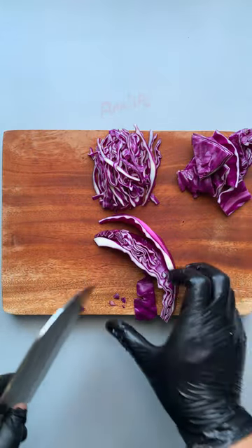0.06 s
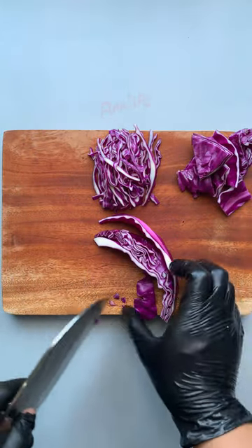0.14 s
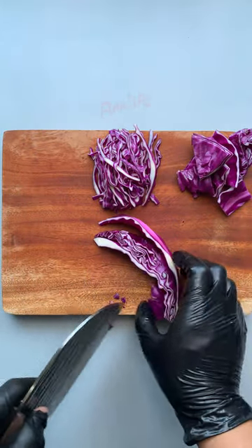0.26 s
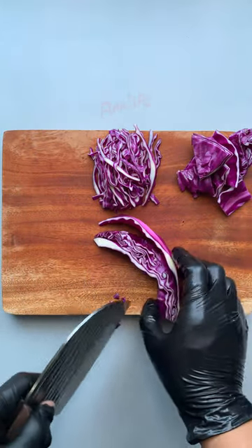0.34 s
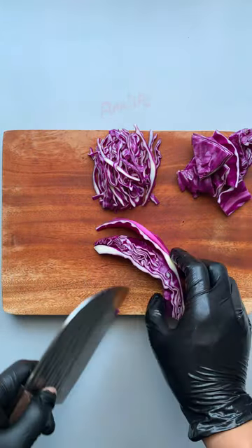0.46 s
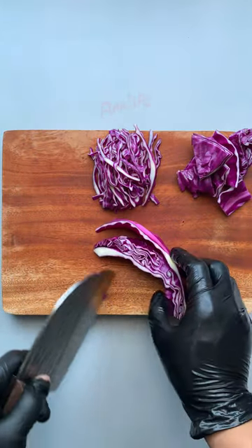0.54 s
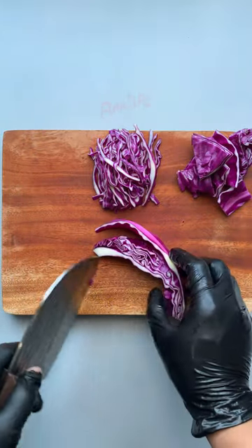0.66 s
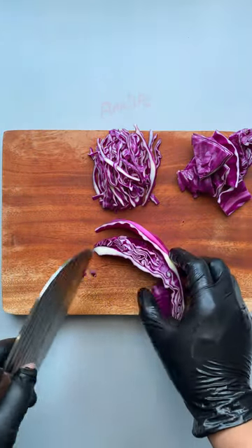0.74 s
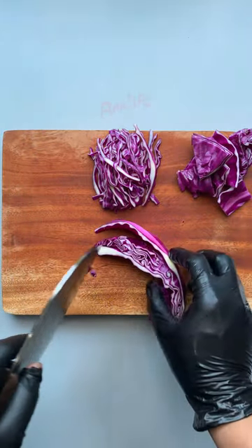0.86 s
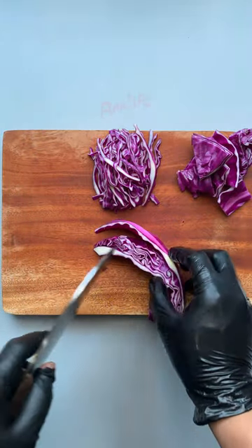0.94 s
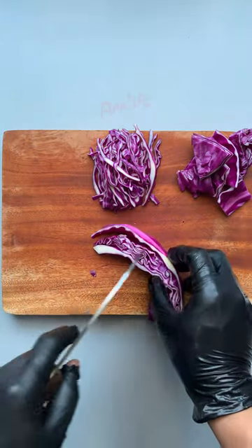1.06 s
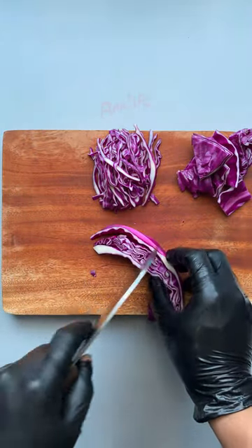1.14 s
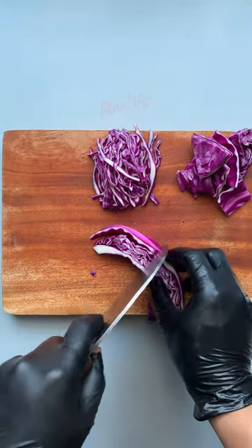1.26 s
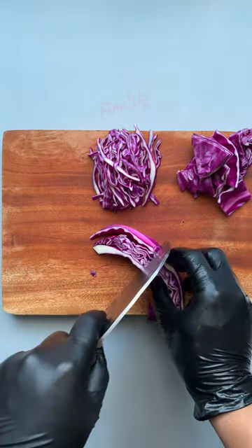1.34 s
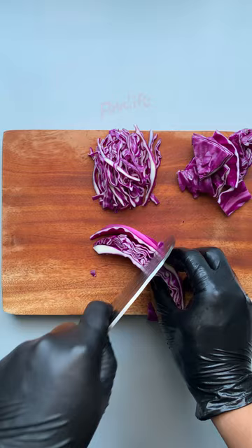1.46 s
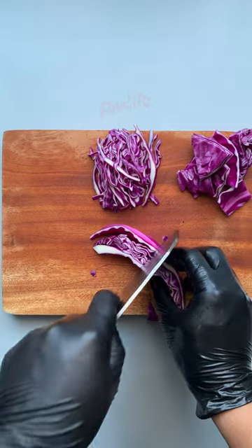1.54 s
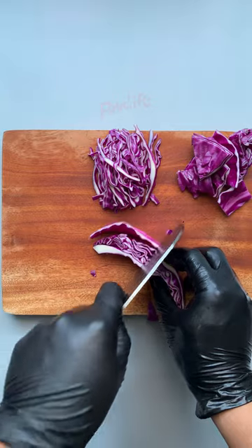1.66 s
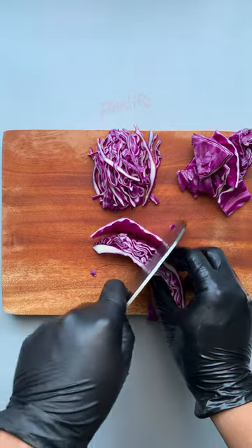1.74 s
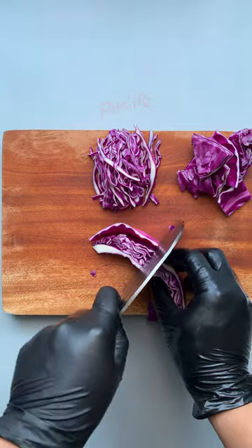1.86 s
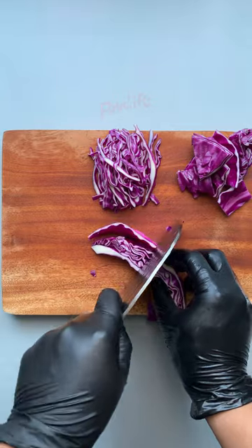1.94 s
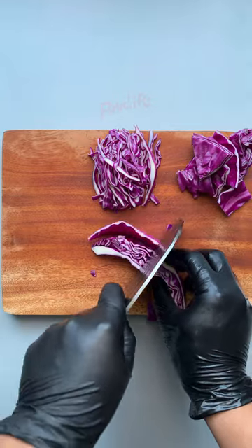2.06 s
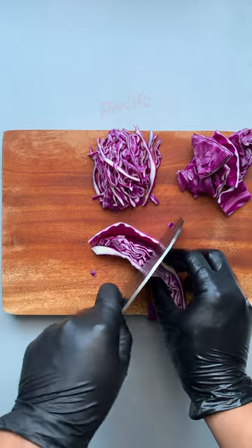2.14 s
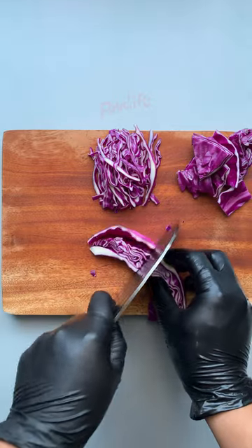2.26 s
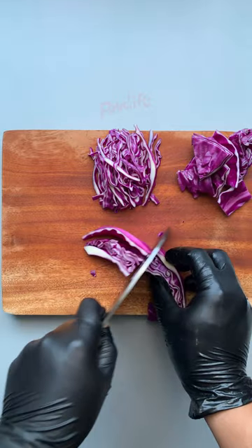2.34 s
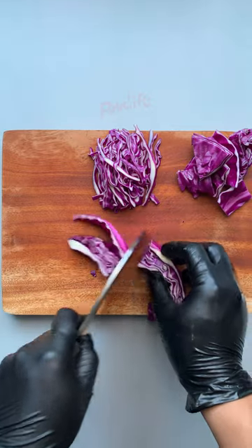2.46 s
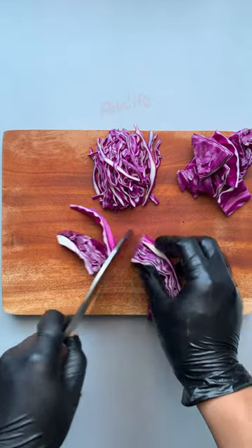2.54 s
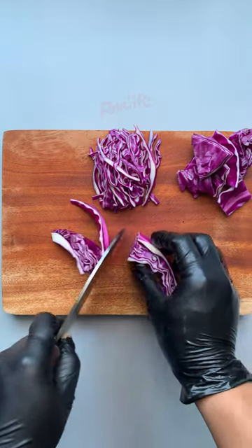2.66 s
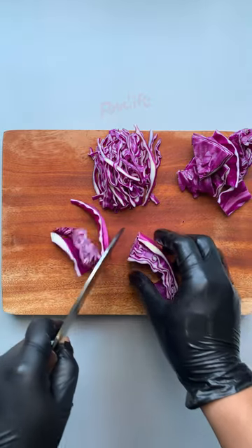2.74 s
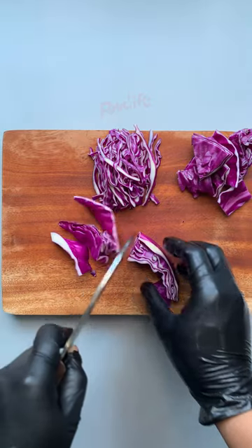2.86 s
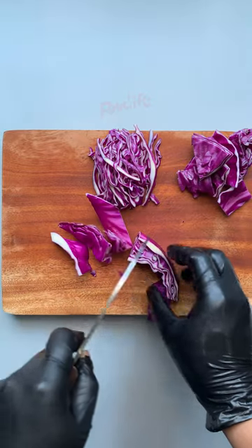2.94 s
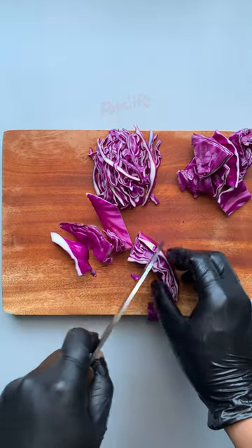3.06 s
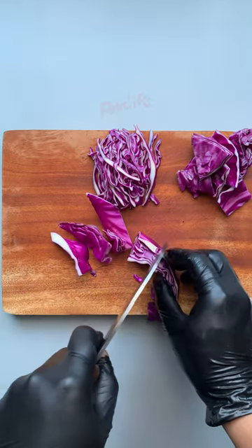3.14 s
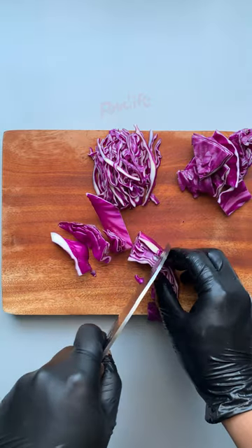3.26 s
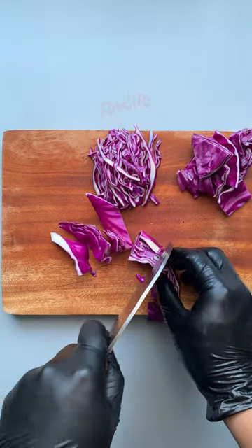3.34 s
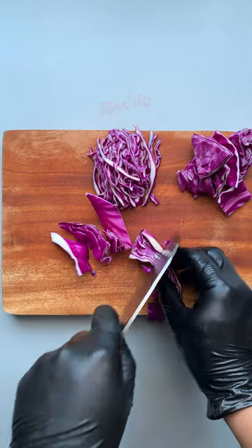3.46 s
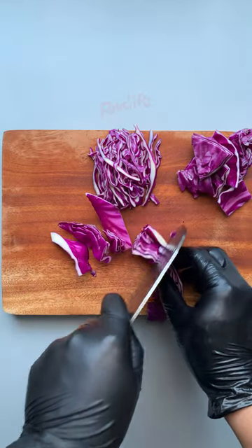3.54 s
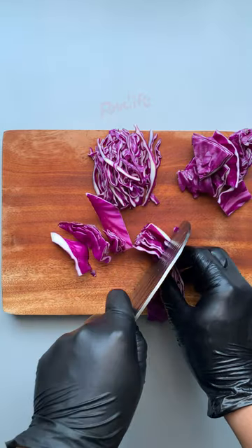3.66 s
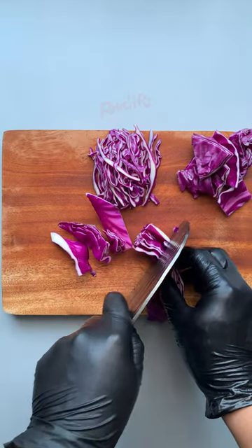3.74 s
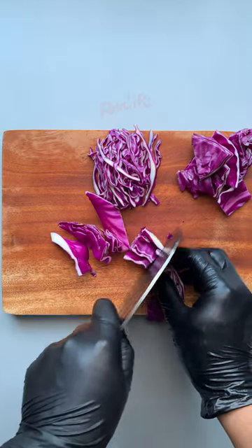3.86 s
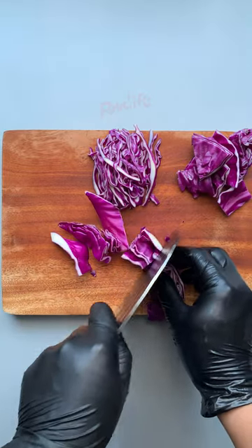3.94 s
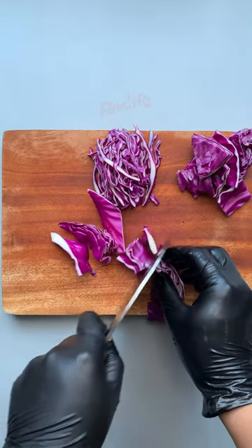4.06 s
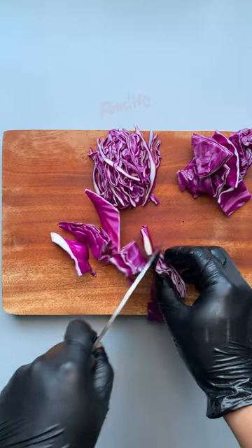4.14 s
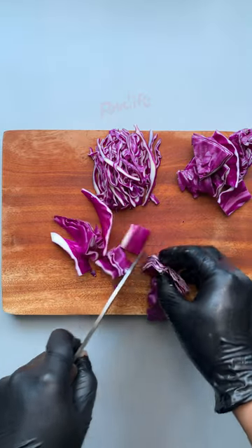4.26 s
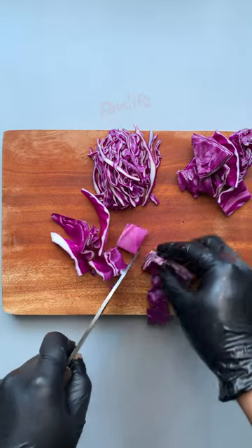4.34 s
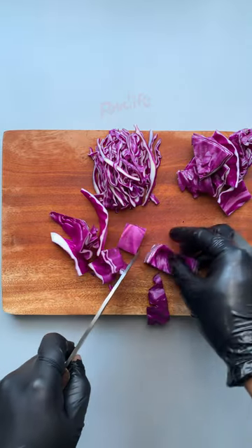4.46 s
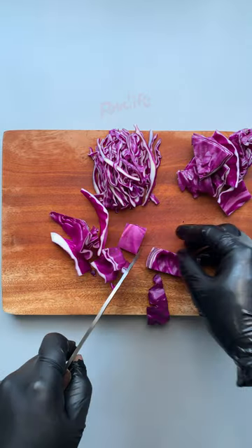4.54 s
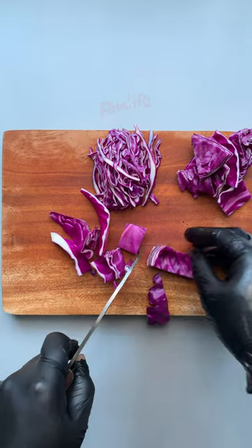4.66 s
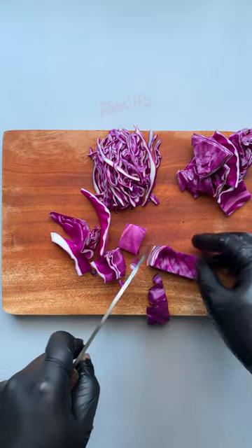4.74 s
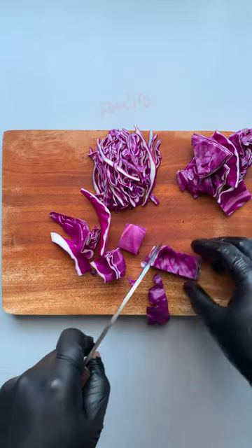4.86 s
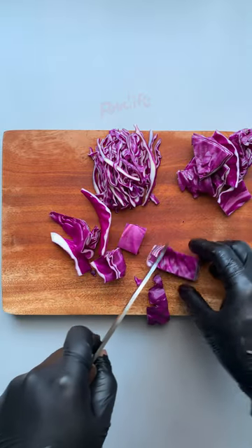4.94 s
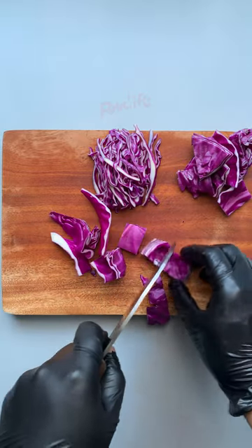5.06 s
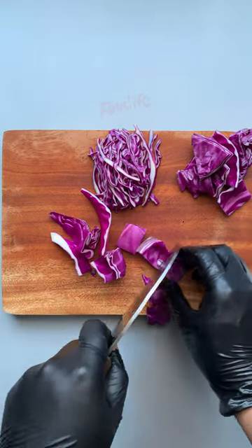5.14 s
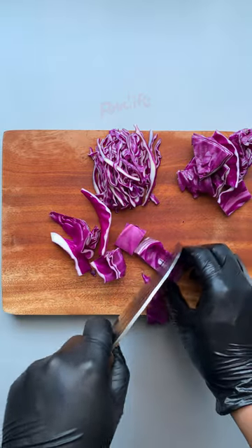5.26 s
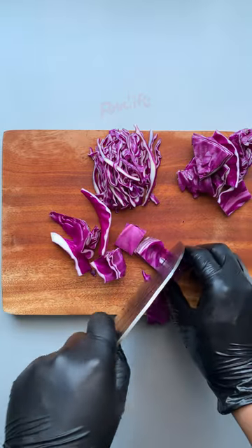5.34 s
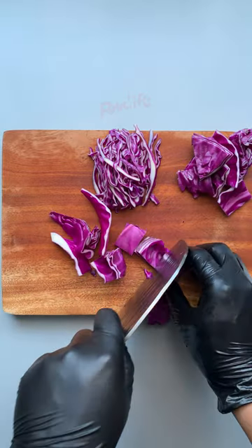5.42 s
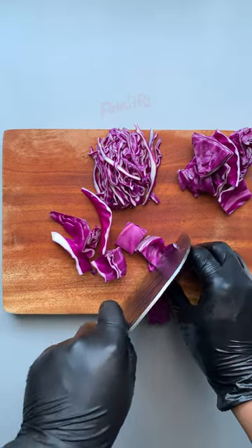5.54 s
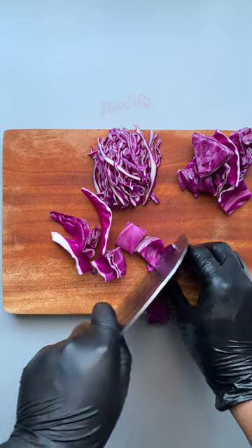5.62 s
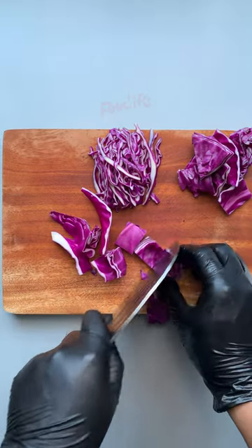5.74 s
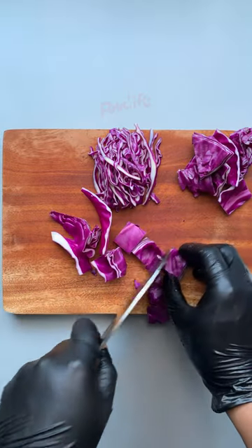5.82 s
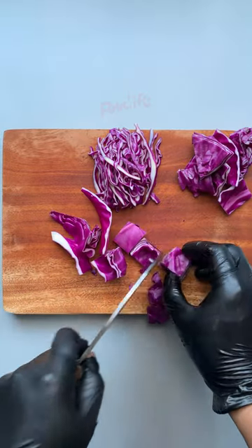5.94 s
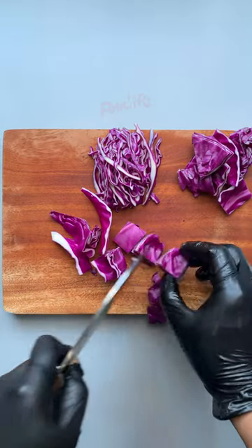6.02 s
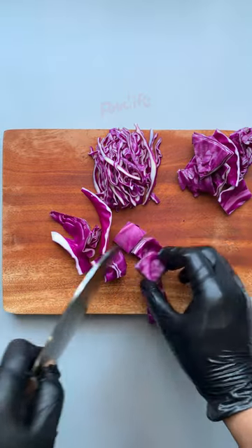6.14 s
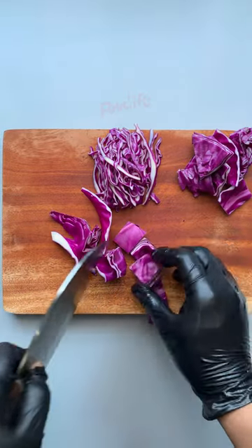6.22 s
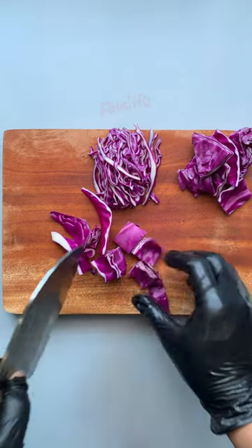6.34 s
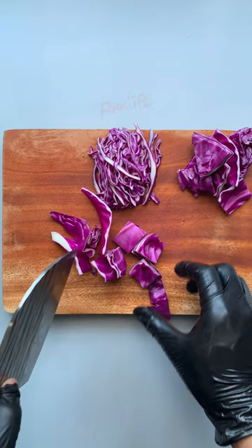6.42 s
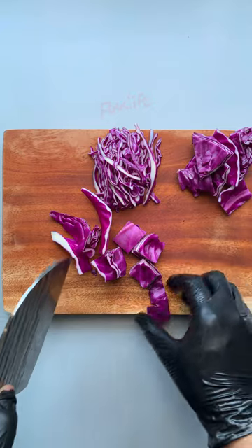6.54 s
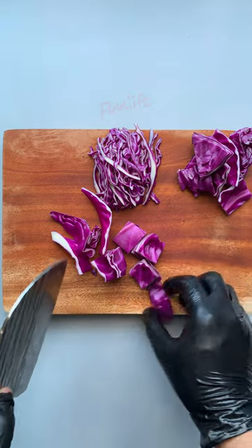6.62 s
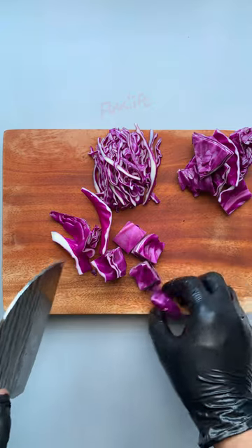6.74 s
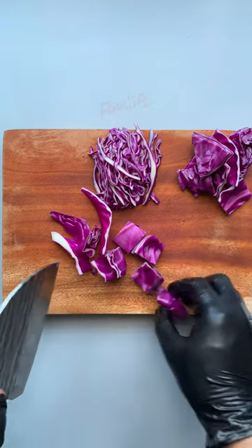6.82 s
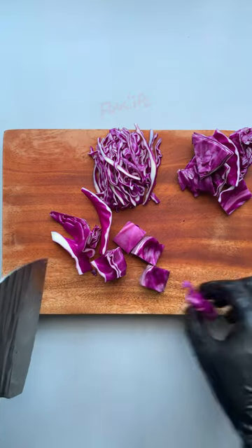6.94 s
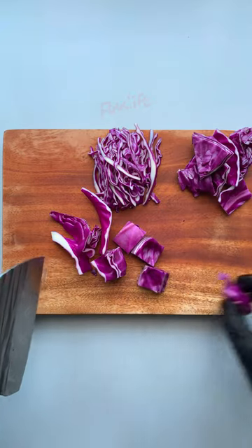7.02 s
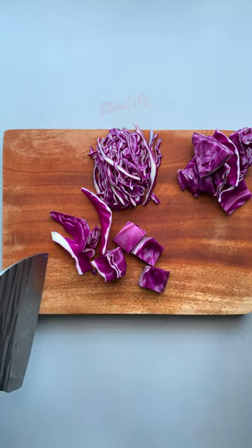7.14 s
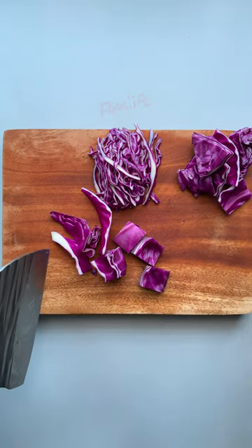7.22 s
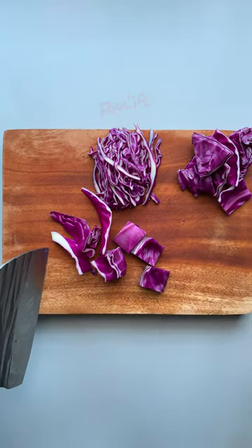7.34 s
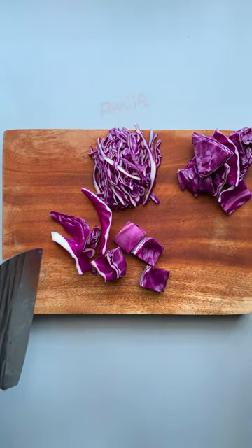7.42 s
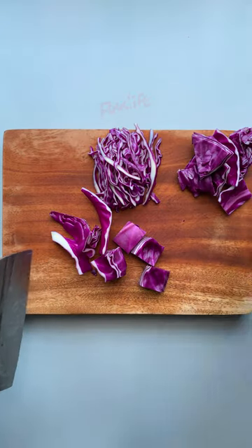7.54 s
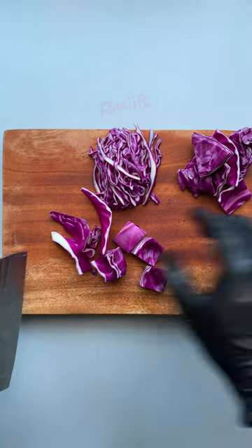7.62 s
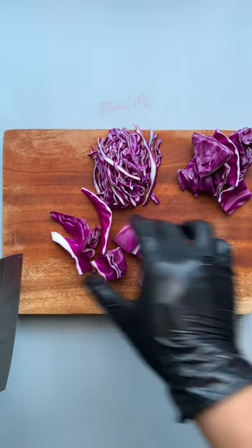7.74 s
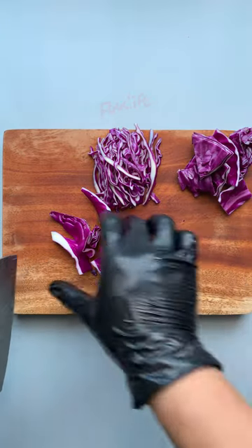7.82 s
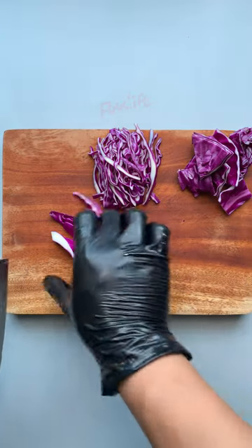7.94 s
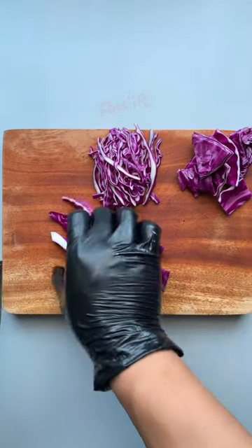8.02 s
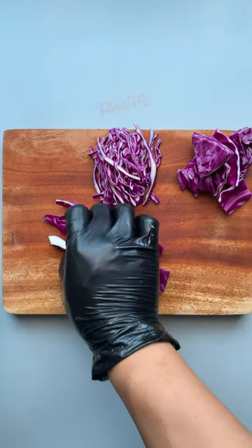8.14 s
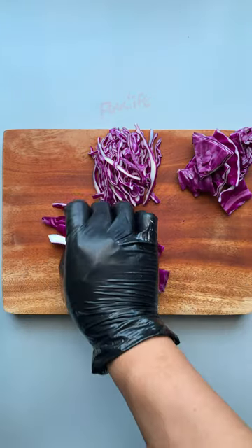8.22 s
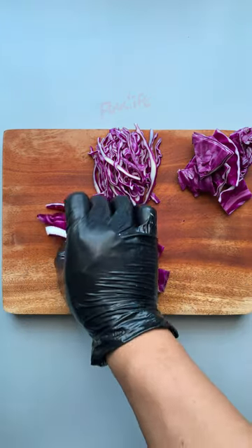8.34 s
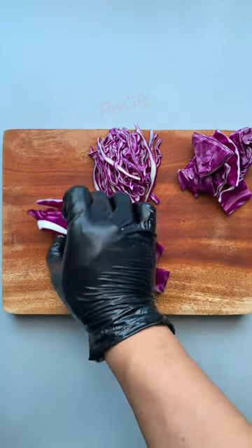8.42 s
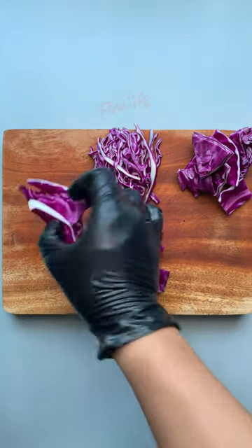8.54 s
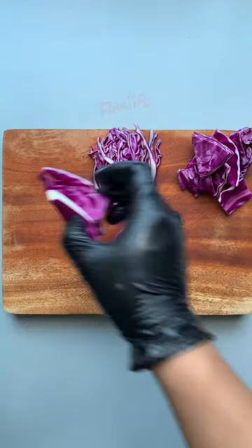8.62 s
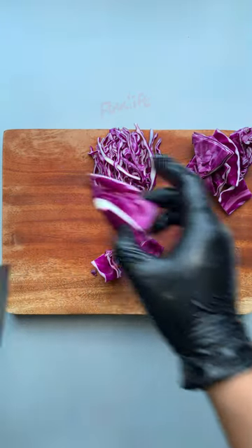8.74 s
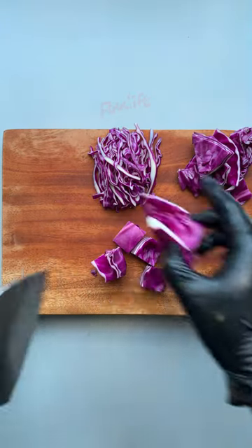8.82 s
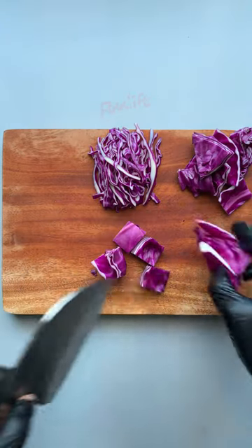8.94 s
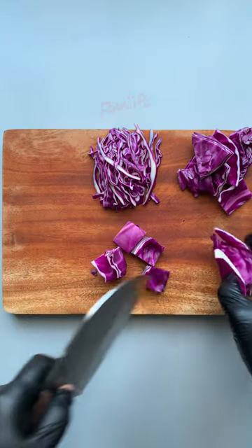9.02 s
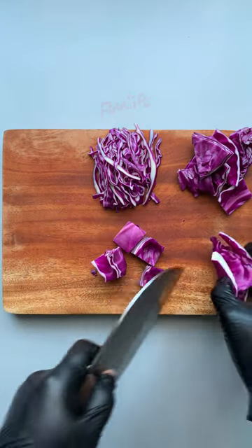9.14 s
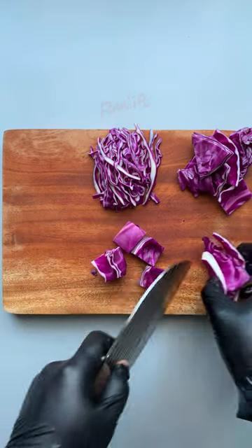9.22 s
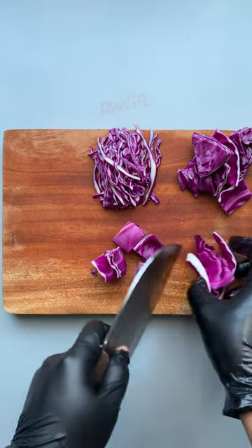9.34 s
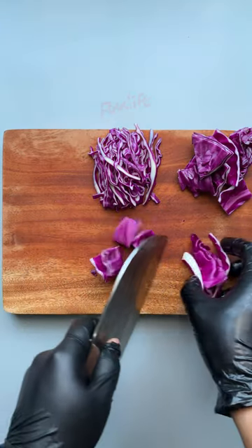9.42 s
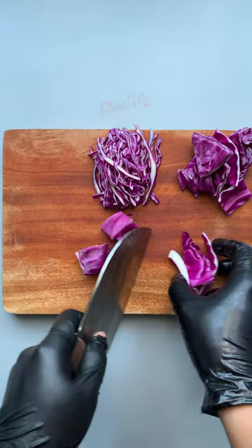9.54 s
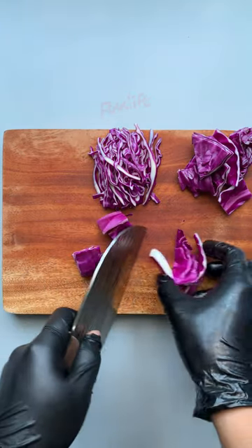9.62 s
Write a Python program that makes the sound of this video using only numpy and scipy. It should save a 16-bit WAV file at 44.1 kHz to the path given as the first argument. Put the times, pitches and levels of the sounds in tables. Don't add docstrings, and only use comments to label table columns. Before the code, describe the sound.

Close above a wooden cutting board in a quiet, slightly reverberant kitchen, a heavy knife crunches through crisp cabbage. A light knock and steel slide come first, then a tearing cut and raspy scrape, a longer cut ending in a loud sharp knock, and a quick last cut. Gloved hands then rustle and tick among wet leaves before a short skipping blade scrape. Low appliance hum continues beneath.

```python
import sys
import numpy as np
from scipy import signal
from scipy.fft import rfft, irfft
from scipy.io import wavfile
from scipy.ndimage import uniform_filter1d, map_coordinates

SR = 44100
rng = np.random.default_rng(int(sys.argv[2]) if len(sys.argv) > 2 else 0)


def pcm_store(signal):
    levels = np.round(np.clip(np.atleast_2d(signal), -1, 1) * 32767)
    wavfile.write(sys.argv[1], SR, levels.astype(np.int16).T)


def invert_db(x):
    u = np.asarray(x, float) / 20
    return 10 ** u


N = 426888
T = np.arange(N) / SR
HZ = np.maximum(np.arange(N // 2 + 1) * SR / N, 1)

# (pitch [Hz], level [dB])
HUM = [(15, -45), (25, -20), (87, 2), (119, -4), (192, -10.5), (363, -15.5), (425, -12.5), (485, -19),
       (802, -25), (868, -27), (1130, -27.5), (3730, -33.5), (5000, -42), (8000, -55), (10000, -52.5),
       (11400, -57), (14000, -70)]
HUM_DB = -56.5
# (time [s], level [dB])
AIR = [
    [(0, 1), (1, -2), (2.5, 2), (4.3, 4), (5.2, 4.5), (6.2, 2), (6.8, 4), (7.5, 3.5), (8.3, 0), (9, -2.5),
     (9.68, 1)],
]
PATCHY_DB = 1.5

# (start [s], level [dB], hold [s])
RUSTLES = [(0.0, -60, 0), (0.27, -68.5, 0.061), (0.38, -62.5, 0.026), (0.655, -73.5, 0.038),
           (0.784, -55.5, 0), (0.93, -75.5, 0.039), (1.102, -68, 0), (1.292, -66.5, 0.15),
           (1.81, -64.5, 0.06), (2.08, -43.5, 0.024), (2.17, -62, 0.024), (2.62, -63.5, 0.056),
           (2.734, -62.5, 0.069), (3.212, -73.5, .05), (3.33, -58, 0.012), (3.791, -37.5, 0),
           (4.292, -73.5, 0.094), (4.56, -75, 0.16), (4.625, -67, 0), (4.87, -78, 0.069),
           (5.274, -74.5, 0.19), (5.395, -60.5, 0.019), (5.505, -33, 0.011), (5.6, -58.5, 0.17),
           (5.78, -47.5, 0.014), (5.83, -72, 0.031), (5.899, -55, 0), (5.93, -64, 0.22), (6.2, -79, 0.29)]
# (start [s], level [dB], hold [s])
GRIPS = [(7.21, -62, 0.011), (7.36, -57.5, 0.029), (7.6, -62, 0.076), (7.675, -53.5, 0.022),
         (7.75, -55, 0.039), (7.93, -56.5, 0), (8.02, -63.5, 0), (8.22, -65, 0), (8.33, -73, 0.0045),
         (8.5, -70, 0.0087), (8.615, -62.5, 0.19), (8.742, -56.5, 0.0028), (8.86, -64.5, 0.083),
         (9.12, -82, 0.034), (9.31, -56, 0.0053), (9.36, -75, 0.13)]
# (time [s], level [dB])
CUTS = [
    [(1.42, -71.5), (1.49, -60.5), (1.566, -55), (1.58, -51), (1.65, -42), (1.706, -46), (1.8, -74)],
    [(1.888, -72), (1.894, -53.5), (1.924, -57.5), (2.018, -90.5)],
    [(2.018, -79), (2.06, -51.5), (2.08, -43.5)],
    [(3.38, -71), (3.466, -55.5), (3.48, -44.5), (3.552, -43), (3.61, -40.5), (3.66, -45.5), (3.726, -67),
     (3.766, -55), (3.785, -60.5)],
    [(5.43, -57), (5.476, -49), (5.496, -35.5), (5.505, -33.5)],
]
# (tearing [dB], boom of the packed leaves [dB], upper board notes [dB])
CUT_MIX = [
    (-2.5, 3, -16.5),
    (10.5, 10.5, -22),
    (8.5, 1.5, -13),
    (-7, 0, -14),
    (-7.5, 1, -1.5),
]
# (pitch [Hz], level [dB], ring time [s])
HEADS = [
    [(318, 4.5, 0.072), (486, 4.5, 0.036)],
    [(280, 8, 0.14), (606, -11, 0.08)],
    [(300, 15.5, 0.08), (606, -25, .04)],
    [(317, -3.5, .07), (380, 0, .07), (650, -4.5, 0.032)],
    [(272, -2.5, 0.11), (470, 7.5, .04)],
]
# (pitch [Hz], level [dB])
LEAF = [(2500, -22), (4100, 1), (5100, -1), (6200, -3), (8000, -1), (10000, 0), (12500, -9.5),
        (14300, -5.5), (15500, -19.5), (16500, -54)]
# (pitch [Hz], level [dB])
TEARING = [(900, -7), (1400, -9), (2200, -5), (3000, -2), (3700, -1.5), (5000, -7.5), (7000, -26)]

# (pitch [Hz], level [dB], ring time [s])
ROOM = [(90.04, -11.5, 0.27), (193.6, 2, 0.65), (455, -9.5, 0.74), (985, -9, 0.98), (1980, -10, 0.56),
        (3300, -15.5, 0.8), (5300, -30, .25), (9000, -28, .2)]
HUSH_DB = -57

# (time [s], peak [dB], then relative to it: low notes [dB], upper notes [dB], hard crack [dB])
KNOCKS = [(0.39, -28.5, -1, -37, -7.5), (1.383, -47.5, 7, -26.5, -21), (2.083, -30, 0, -5, -21.5),
          (3.327, -33.5, 2, -18, -41.5), (3.8055, -3, -18.5, -7, -3.5), (4.175, -47, -10, -1.5, 2),
          (5.41, -37.5, 4, -15.5, -29.5), (5.496, -39, -1, -23, -41), (5.515, -8.5, -9, -23.5, -31),
          (5.528, -25, -1.5, -15, -8.5), (5.617, -55.5, 18, -38.5, -21), (5.797, -15, -13, -4, -21),
          (7.405, -55.5, -6, -4.5, 1), (3.8132, -21, -10.5, -10, 6)]
# (pitch [Hz], level [dB], ring time [s])
BOARD = [(104, -0.5, 0.71), (119.6, 3, 0.51), (177, 5.5, 0.11), (271.6, 2, 0.11), (330, 3, 0.1),
         (471, 1.5, 0.038), (508.4, -0.5, 0.034), (650, 0, 0.028), (780, -15.5, 0.038), (872, 5, 0.03215),
         (1121, 10, 0.065), (1453, 2.5, 0.12), (1664, -15.5, 0.04), (1901, -0.5, 0.04), (2180, -17, 0.034),
         (2460, -26.5, .012), (3250, -22.5, 0.036), (3150, -30.5, .01)]
# (pitch [Hz], level [dB], ring time [s])
RIM = [(458, -1, 0.09), (655, 1.5, 0.087), (693, -4, 0.21), (800, -3, 0.069)]
# (pitch [Hz], level [dB], ring time [s])
ROCK = [(118.2, 0, .35), (141, -3, 0.23)]
# (time of the knock [s], level under it [dB], swell [s])
LEAD_INS = [
    (.389, -18.5, 0.006),
    (2.086, -37, .004),
    (3.805, -27, .015),
    (5.515, -49, .0045),
    (5.796, -30, 0.0046),
]
THUD_DB = -10
# (time [s], energy [dB], lowest [Hz], highest [Hz])
BLASTS = [(.391, -6, 151, 450), (.391, -3, 470, 880), (2.085, -4.5, 175, 500), (3.807, 13, 330, 800),
          (3.807, 14, 800, 2050), (3.807, -15, 2278, 4000), (3.806, 2.5, 146, 300), (5.516, 6, 162, 650),
          (5.515, -12, 650, 1600), (5.798, -6.5, 247, 890), (5.798, -7.5, 873, 1350),
          (3.329, -12.5, 120, 500)]
DIRECT_DB = -11

# (time [s], level [dB])
SCRAPES = [
    [(2.22, -69.5), (2.262, -65), (2.36, -59), (2.43, -57)],
    [(9.47, -68), (9.488, -56.5), (9.51, -75), (9.518, -54.5), (9.652, -71.5), (9.68, -67)],
    [(2.43, -54), (2.45, -51.5), (2.54, -50), (2.575, -55.5), (2.618, -79.5), (2.64, -68)],
]
# (grain rasp [dB], shaken board [dB])
SCRAPE_MIX = [
    (4, 2.5),
    (1, 0.5),
    (2, 7),
]
# (time [s], level [dB])
SLIDES = [
    [(0.42, -65), (0.446, -75), (0.452, -60.5), (0.56, -51.5), (0.638, -77), (0.66, -73)],
    [(3.95, -76.5), (4.02, -57), (4.124, -65), (4.146, -56), (4.166, -73), (4.174, -62), (4.24, -74)],
]
# (pitch [Hz], level [dB], ring time [s])
STEEL = [
    [(3440, -6.5, .03), (3930, -6, .03), (5800, 3, .04), (6700, 4, 0.043), (7140, -0.5, .04),
     (8700, -5.5, .04), (12100, -5, .05)],
    [(3000, 1.5, .08), (3590, -2, .05), (5840, 0.5, 0.051), (6300, 0, .04), (6910, 1.5, 0.041),
     (8580, -5, .06), (12100, -9.5, .06)],
    [(2920, 1, 0.1), (3660, 4.5, 0.056), (4070, -7.5, .04), (4880, -11, .06), (5750, 0.5, 0.048),
     (6460, -15.5, 0.043), (6800, -10.5, .04), (7200, -3, 0.044), (8840, 2.5, .04), (10400, -10.5, .07),
     (10750, -6, .03), (12100, -7.5, .05), (13400, -17, .03)],
    [(3000, -2, .07), (3240, -8.5, .08), (4000, -16, .07), (4880, -17, .07), (5700, -5, .06),
     (6170, -5, 0.098), (6700, -6, .03), (7170, -6, .07), (8900, 8, .06), (10300, -3, .08),
     (11900, -8, .05), (12100, -6, .06), (13400, -11, .05)],
    [(3620, 3, .08), (5060, 5, 0.067), (6150, 2.5, 0.022), (6560, 1, 0.035), (7140, -4, .04),
     (8620, 3.5, .03), (11200, -10.5, .03), (12000, -9, .025)],
]
# (time [s], level [dB])
BLADE_TAPS = [
    (.392, -65.5),
    (2.44, -70),
    (2.47, -82),
    (2.5, -69),
    (2.525, -60),
    (2.55, -64),
    (2.58, -71.5),
]
# (pitch [Hz], level [dB], ring time [s])
FREE = [(1938, -2, .5), (1946, -9, .3)]
# (time [s], level [dB])
BOUNCES = [
    (9.486, -47.5),
    (9.519, -40.5),
    (9.543, -47.5),
    (9.566, -55),
    (9.582, -47.5),
    (9.6, -58),
    (9.63, -60),
]
# (pitch [Hz], level [dB], ring time [s])
PRESSED = [(834, -10, 0.14), (1103, -1.5, 0.072), (1750, -12.5, 0.14), (2670, 0.5, 0.073),
           (3000, -14, 0.099), (3570, -14, 0.11), (4870, -5, 0.11)]
# (pitch [Hz], level [dB], ring time [s])
SCRAPED = [(682, 8, 0.02), (1096, 5, 0.025), (1383, -6, .03)]
# (pitch [Hz], level [dB])
GRAIN = [(900, -3), (1400, -13.5), (2200, -7.5), (3000, -2), (3600, 3.5), (4400, 2.5), (5200, -5.5),
         (7000, -21)]
FLEX_S = 1.1e-4

# (time [s], peak [dB], pitch [Hz], low part, relative [dB])
SNAPS = [(0.4537, -43, 6900, -23), (0.4897, -53, 6600, -19), (0.6557, -40, 8900, -8),
         (1.4333, -53, 5690, -13), (1.5313, -37.5, 8660, -11.5), (1.5788, -29.5, 12100, -12.5),
         (1.6863, -24, 12500, -8), (1.8946, -33.5, 6000, -39), (2.0527, -36.5, 7500, 17),
         (2.1725, -54, 7180, -14), (2.2775, -44.5, 7030, -6), (3.3323, -52, 10760, -15),
         (3.468, -29.5, 9000, -21), (3.4945, -27, 8110, -14.5), (3.5783, -21, 8506, -7.5),
         (3.7486, -45, 6052, -1), (3.7915, -24.5, 11330, -20.5), (4.1752, -44.5, 6100, -18),
         (5.4367, -41.5, 7170, -18), (5.454, -33, 7700, -24), (5.4919, -23.5, 5930, -19),
         (5.5368, -17, 6366, -24), (5.7745, -34.5, 12130, -25), (5.897, -35.5, 6530, -5.5),
         (6.0255, -32, 6600, -2), (8.1929, -46, 7330, 5.5), (9.3117, -37, 6500, 3.5),
         (9.4843, -58, 6780, -22), (9.5197, -47, 6700, 15), (9.5413, -46, 5440, 7.5),
         (1.57, -33, 11500, -4.5), (1.591, -29, 12520, -14), (1.595, -32.5, 12260, -24),
         (1.6249, -29.5, 8130, -6.5), (1.6504, -26.5, 7050, 0), (1.701, -32.5, 12000, -10),
         (3.4348, -43, 11470, -7.5), (3.4478, -37, 12100, -12), (3.5061, -28.5, 8200, -4),
         (3.513, -31, 8075, -9.5), (3.591, -30.5, 12950, -15), (3.6034, -21, 12110, -12.5),
         (3.61, -24.5, 6800, -11.5), (3.626, -30.5, 7516, -4), (3.762, -40.5, 12340, -13.5)]
# (time [s], peak [dB], pitch [Hz])
TICKS = [(0.7841, -53, 8050), (2.642, -44, 6000), (2.7357, -46, 6100), (2.7593, -41, 11800),
         (2.8672, -47.5, 7000), (2.9011, -43.5, 7000), (4.6248, -50.5, 7900), (5.3922, -42, 7990),
         (5.704, -41, 11760), (5.9555, -42, 6700), (6.119, -40, 6900), (7.2058, -44, 12700),
         (7.3544, -39.5, 8740), (7.4849, -49.5, 6940), (7.66, -40.5, 5570), (7.675, -36.5, 8800),
         (7.7702, -36.5, 8700), (7.7916, -38.5, 8000), (7.9259, -50, 7000), (8.0166, -45, 6570),
         (8.2249, -52, 6790), (8.5138, -45, 12560), (8.6313, -48.5, 8640), (8.6716, -42.5, 8200),
         (8.7155, -39.5, 6100), (8.7453, -43.5, 6440), (8.832, -42, 8650), (8.8603, -41, 8600),
         (8.9376, -56, 8360), (9.414, -53.5, 6680), (7.3713, -42, 8350), (7.385, -49, 8000),
         (7.47, -52, 7300), (7.7449, -51, 6700), (7.893, -52, 7300), (7.953, -42.5, 6930),
         (8.068, -63, 12000), (8.248, -48.5, 6780), (8.5026, -53, 13100), (8.6423, -38, 8760),
         (8.6902, -46, 7730), (8.9915, -58, 6980), (9.1219, -57, 6820), (9.43, -56, 6300),
         (5.972, -46.5, 6800), (6.017, -42.5, 6460), (5.755, -48.5, 6800), (2.713, -59, 7200),
         (2.815, -62, 8000), (0.471, -38.5, 7160), (.51, -36, 6900)]
TICK_LOW_DB = -14.5
TICK_SPAN = 1.14

# (time [s], level [dB])
THUMPS = [
    (2.441, -52),
    (4.15, -57),
    (9.488, -53),
    (0.81, -66.5),
    (3.35, -55),
    (1.39, -57),
]
# (pitch [Hz], level [dB], ring time [s])
TABLE = [(109.6, 2.5, 0.17)]

# (start [s], end [s], start level [dB], end level [dB], pitch [Hz])
SQUEALS = [
    (3.13, 3.49, -72, -71, 1530),
    (5.22, 5.48, -73, -58, 1410),
    (1.905, 1.955, -42, -52, 2190),
    (3.468, 3.54, -52, -56, 1000),
]
SQUEAL_WIDTH_HZ = [450, 700, 900, 600]

# (pitch [Hz], share [0 to 1])
UNLIKE = [(100, 0.12), (400, 0.54), (1000, 0.74), (2500, 0.78), (4500, 0.9), (6500, 0.034), (15000, 0.04)]
# (pitch [Hz], turn [radians])
CASE_TURN = [(2300, 0), (2800, .35), (3400, 1.0), (4100, 1.6), (4500, 1.7), (4900, .8), (5500, 0)]
NEAR_SCATTER = .14
PORT_LAG_S, PORT_TURN, PORT_HZ, TOP_HZ = 1.905e-4, 2.12, 700, 16450
NOTCH_HZ, NOTCH_WIDTH_HZ, NOTCH_DB = 9850, 450, 7


def unit(x):
    return x / np.sqrt(np.mean(x ** 2))


def along(table):
    hz, value = np.transpose(table)
    return np.interp(np.log(HZ), np.log(hz), value)


def colour(x, table):
    return unit(irfft(rfft(x) * invert_db(along(table)), N))


def between(x, low_hz, high_hz, order=2):
    return signal.sosfilt(signal.butter(order, [low_hz, high_hz], "band", fs=SR, output="sos"), x)


def above(x, hz):
    return signal.sosfilt(signal.butter(2, hz, "high", fs=SR, output="sos"), x)


def fade(t, t60):
    return np.exp(-np.log(1000) * t / t60)


def mixed(curves, mix, order):
    total = 0
    for curve, row in zip(curves, mix):
        s, db = np.transpose(curve)
        total = total + invert_db(row[order]) * invert_db(np.interp(T, s, db, -200, -200))
    return total


def gains(curves):
    return mixed(curves, [(0,)] * len(curves), order=0)


def ring(push, modes):
    out = 0
    for hz, db, t60 in modes:
        r, turn = fade(1 / SR, t60), 2 * np.pi * hz / SR
        note = signal.lfilter([1], [1, -2 * r * np.cos(turn), r * r], push)
        out = out + invert_db(db) * np.sqrt(1 - r) * np.sin(turn) * note
    return out


def add(track, s, sound):
    i = int(s * SR)
    track[i:i + len(sound)] += sound[:N - i]


def cracks(rate, spread_db, smear_s):
    size = invert_db(spread_db * np.minimum(rng.exponential(size=N), 4.5))
    snaps = (rng.random(N) < rate / SR) * size
    puffs = signal.lfilter([1], [1, -np.exp(-1 / (smear_s * SR))], snaps)
    return unit(rng.standard_normal(N) * puffs)


def jolts(table):
    out = np.zeros(N)
    for s, db in table:
        add(out, s, invert_db(db + 48.5) * np.ones(1))
    return out


def stirs(table, rise_db_s, fade_db_s):
    out, early = np.zeros(N), .05
    t = T[:SR // 2] - early
    for s, db, hold in table:
        shape = invert_db(db + rise_db_s * np.minimum(t, 0) - fade_db_s * np.maximum(t - hold, 0))
        add(out, max(s - early, 0), shape[int(max(early - s, 0) * SR):])
    return out


def wander(rate):
    smooth = uniform_filter1d(rng.standard_normal(N), SR // rate)
    return unit(uniform_filter1d(smooth, SR // rate))


def hum():
    sway = wander(rate=3)
    both = invert_db(HUM_DB) * np.array([colour(rng.standard_normal(N), HUM) for _ in range(2)])
    spectrum = rfft(both)
    bass, middle = (irfft(spectrum / (1 + (HZ / hz) ** 4), N) for hz in (450, 1800))
    air = (middle - bass) * invert_db(PATCHY_DB * wander(rate=9))
    air = air + (both - middle) * invert_db(PATCHY_DB * wander(rate=12))
    return bass * invert_db(1.4 * sway) + air * gains(AIR)


def leaves():
    fibres = cracks(2500, spread_db=3.0, smear_s=.001)
    fibres = fibres + .3 * cracks(200, spread_db=4.0, smear_s=.0004)
    cut = colour(fibres, LEAF) * gains(CUTS) * invert_db(3.0)
    tearing = colour(cracks(3800, spread_db=0.0, smear_s=0.0037), TEARING)
    tearing = tearing * mixed(CUTS, CUT_MIX, order=0) * invert_db(4.5)
    stirring = stirs(RUSTLES, 2500, 380) + stirs(GRIPS, 1450, 225)
    rustle = colour(cracks(1000, spread_db=2.5, smear_s=0.0019), LEAF) * stirring * invert_db(-1.5)

    force = cracks(830, spread_db=1.0, smear_s=0.0019)
    low = 0
    for curve, mix, modes in zip(CUTS, CUT_MIX, HEADS):
        low = low + ring(force * mixed([curve], [mix], order=1), modes)
    damped = [(hz, db, min(t60, .035)) for hz, db, t60 in BOARD[8:12]]
    high = ring(force * mixed(CUTS, CUT_MIX, order=2), damped)
    high = high + ring(force * mixed(SCRAPES, SCRAPE_MIX, order=1), SCRAPED)
    return cut + tearing + rustle + invert_db(-1.5) * above(low, 210) + invert_db(-6.5) * high


def room(x):
    t, tail = T[:SR], 0
    for hz, db, t60 in ROOM:
        band = between(rng.standard_normal((2, SR)), hz / 1.5, hz * 1.5)
        tail = tail + invert_db(db) * band * fade(t, t60) / np.sqrt(t60 * SR / 14)
    tail = tail * (1 - np.exp(-(t / .014) ** 2))
    wet = signal.fftconvolve(x[None], tail, axes=1)[:, :N]
    power = np.abs(uniform_filter1d(np.mean(wet ** 2, axis=0), SR // 25))
    return wet * power / (power + invert_db(2 * HUSH_DB))


def knocks():
    out, t = np.zeros(N), T[:SR // 3]
    hz, db, t60 = np.transpose(BOARD)[:, :, None]
    t60 = np.minimum(t60, 28 / hz)
    lead = T[:SR // 75] - T[SR // 75]
    chances = rng.standard_normal((len(KNOCKS), len(lead)))
    for (s, peak_db, low, upper, crack), chance in zip(KNOCKS, chances):
        weight = np.interp(hz, [180, 250, 340, 450, 700, 850, 1100, 1400],
                           [low + THUD_DB, low, low, 0, 0, upper, upper, crack])
        spread = 1 + .004 * chance[:len(hz), None]
        waves = np.sin(2 * np.pi * hz * spread * t) * fade(t, t60)
        swing = (1 - np.exp(-t / (.0004 + 0.54 / hz))) ** 2
        blow = np.sum(invert_db(db + weight) * waves * swing, axis=0)
        dry_crack = between(chance * np.exp(-T[:len(lead)] / 0.014), 1600, 3400)
        add(blow, 0, invert_db(crack - 11.5) * dry_crack)
        blow = blow * invert_db(peak_db + 2.5)
        add(out, s - .0012, blow)
        for at, lead_in_db, swell_s in LEAD_INS:
            if abs(at - s) < .006:
                swell = chance * np.exp(lead / swell_s) * np.sqrt(1 + lead / -lead[0])
                lead_in = between(signal.fftconvolve(blow, swell), 500, 1700)
                add(out, s + lead[0], invert_db(lead_in_db + 5.5) * lead_in)
    push = np.hanning(SR // 700) / (SR // 1400)
    first = np.convolve(jolts([(KNOCKS[0][0], -42)]), push)[:N]
    out = out + ring(first, RIM + ROCK[:1]) - ring(first, ROCK[1:])
    return above(out, 60)


def blasts():
    out = np.zeros(N)
    for s, db, low_hz, high_hz in BLASTS:
        pulse = between(1. * (T[:SR // 20] == 0), low_hz, high_hz, order=3)
        add(out, s, invert_db(db) * pulse / np.sqrt(np.sum(pulse ** 2)))
    return out


def blade():
    slip = cracks(600, spread_db=3.0, smear_s=0.0027)
    song = 0
    for stroke, modes in zip(SCRAPES + SLIDES, STEEL):
        song = song + ring(slip * gains([stroke]), modes)
    song = song + invert_db(-18.5) * ring(jolts(BOUNCES), PRESSED)
    song = map_coordinates(song, [(T + FLEX_S * wander(rate=25)) * SR], mode="nearest")
    song = invert_db(-2.5) * song + invert_db(6.5) * ring(jolts(BLADE_TAPS), FREE)
    drag = gains(SCRAPES + SLIDES)
    hiss = drag * invert_db(-6.0) * colour(cracks(3000, spread_db=-1.0, smear_s=0.00048), LEAF)
    rasp = mixed(SCRAPES, SCRAPE_MIX, order=0)
    grain = invert_db(2.5) * rasp * colour(cracks(1300, spread_db=3.0, smear_s=0.001), GRAIN)
    return song + hiss + grain


def ticks():
    out, t = np.zeros(N), T[:SR // 20]
    rows = SNAPS + [row + (TICK_LOW_DB,) for row in TICKS]
    for s, peak_db, hz, low in rows:
        snap = rng.standard_normal(len(t)) * (np.exp(-t / 0.00048) + 0.11 * np.exp(-t / 0.0071))
        bands = [(hz / TICK_SPAN, hz * TICK_SPAN, -3.0), (5000, 14500, -10),
                 (3400, 4800, low + 7), (1500, 3000, low - 2.5)]
        sound = sum(invert_db(db) * between(snap, low_hz, high_hz) for low_hz, high_hz, db in bands)
        add(out, s, invert_db(peak_db - 0.5) * sound / np.abs(sound).max())
    return out


def thumps():
    pushes = uniform_filter1d(jolts(THUMPS), SR // 250)
    return above(ring(pushes, TABLE), 60)


def squeals():
    out = 0
    for (start, end, start_db, end_db, hz), width_hz in zip(SQUEALS, SQUEAL_WIDTH_HZ):
        swell = gains([[(start, start_db), (end, end_db)]])
        out = out + swell * wander(width_hz) * np.sin(2 * np.pi * hz * T)
    return invert_db(7.0) * out


def scene():
    wood = knocks()
    rest = leaves() + blade() + ticks() + thumps() + squeals()
    near = wood + rest
    scatter = rng.standard_normal(300) * np.exp(-T[:300] / 0.0007)
    flat = irfft(np.exp(1j * np.angle(rfft(scatter, 512))))
    scattered = NEAR_SCATTER * signal.fftconvolve(near, flat)[:N]
    walls = room(rest + invert_db(DIRECT_DB) * wood + blasts())
    return np.array([near, scattered]) + walls + hum()


def band_limit(x):
    return signal.sosfilt(signal.butter(12, 16530, fs=SR, output="sos"), x)


def record(dry):
    share = np.clip(along(UNLIKE), 0, .99)
    passband = (HZ < TOP_HZ) * invert_db(-NOTCH_DB * np.exp(-((HZ - NOTCH_HZ) / NOTCH_WIDTH_HZ) ** 4))
    shared, apart = rfft(dry) * passband
    shared, apart = shared * np.sqrt(1 - share ** 2), apart * share
    angle = along(CASE_TURN) + PORT_TURN * (1 - np.exp(-HZ / PORT_HZ)) - 2 * np.pi * HZ * PORT_LAG_S
    lean = invert_db(along([(60, .4), (300, 1.6), (2500, 1.6), (5000, .1)]) / 2)
    ports = irfft([(shared + apart) / lean, (shared - apart) * np.exp(1j * angle) * lean], N)
    ports = ports / (1 + ports ** 4) ** (1 / 4)
    return band_limit(above(ports, 30))


dry = scene()
out = record(dry)
pcm_store(out)
```